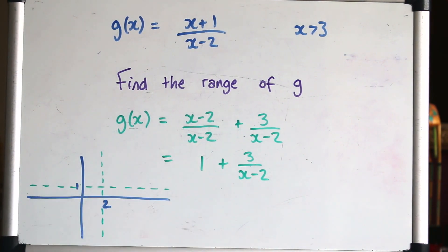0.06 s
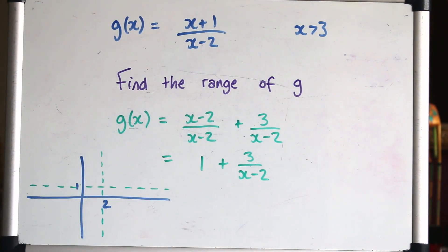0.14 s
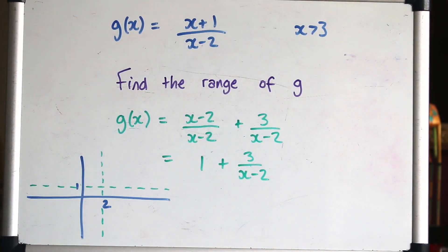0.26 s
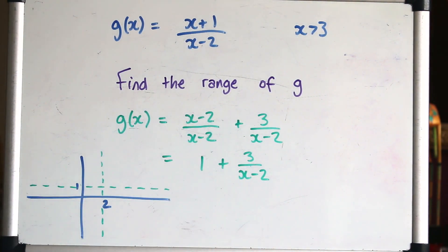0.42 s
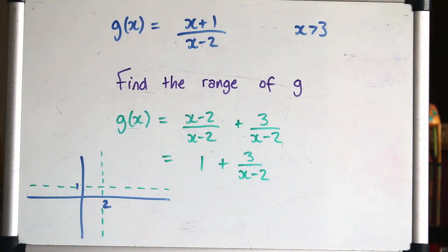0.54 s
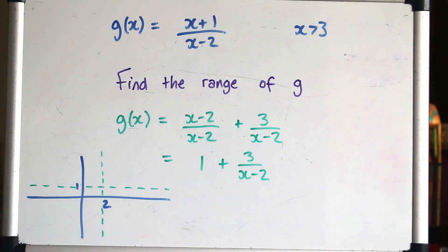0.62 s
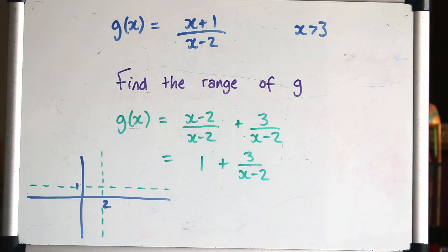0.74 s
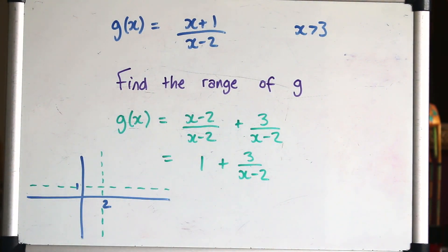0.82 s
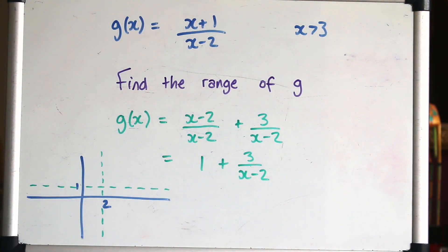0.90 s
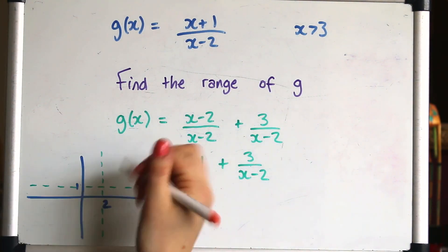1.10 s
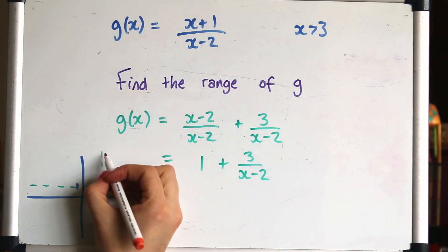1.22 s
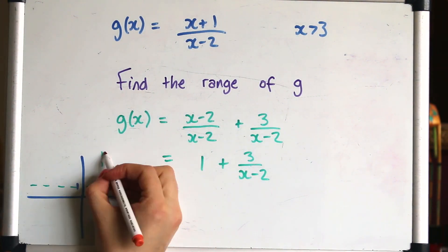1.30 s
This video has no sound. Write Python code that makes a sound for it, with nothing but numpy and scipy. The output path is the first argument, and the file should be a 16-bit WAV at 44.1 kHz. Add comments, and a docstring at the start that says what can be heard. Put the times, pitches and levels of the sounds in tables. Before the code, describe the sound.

A plastic marker pen clicks sharply beside a whiteboard in a quiet room with faint hiss

```python
"""Beside a whiteboard in a quiet room, a plastic marker pen is handled: a few sharp, bright clicks, faint
ticks and rubs, and a low thud as the hand lands on the board, over steady room and microphone hiss.
A click is a filtered impulse plus struck barrel modes, with discrete echoes and a quick spray of decaying
noise for reflections from desk and board. Rubs are random slips in a resonance, the thud is one slow mode,
the hiss is shaped noise, mostly common to both channels."""
import sys
import numpy as np
from scipy import signal
from scipy.fft import rfft, irfft
from scipy.io import wavfile
from scipy.ndimage import uniform_filter1d

SR = 44100
rng = np.random.default_rng(int(sys.argv[2]) if len(sys.argv) > 2 else 0)


def inscribe(sig):
    """Save sig as 16-bit PCM at rate SR to the path in sys.argv[1].

    A 1-D sig is mono; a 2-D sig holds one channel per row.
    Samples are clipped to [-1, 1] before scaling.
    """
    pcm = np.round(np.clip(np.atleast_2d(sig).T, -1, 1) * 32767)
    wavfile.write(sys.argv[1], SR, pcm.astype(np.int16))


def rack_gain(trim_db):
    """Turn a fader trim in dB into the linear factor to multiply a signal by."""
    fader = np.asarray(trim_db, float)
    return 10 ** (fader / 20)


N = 59535
EVENT_SAMPLES = 4096  # length of one click or rub


def rms_one(x):
    """Scale to unit rms."""
    return x / np.sqrt(np.mean(x ** 2) + 1e-20)


def colour(x, points):
    """Filter by a gain curve of (Hz, dB) points, interpolated over log frequency."""
    hz = np.maximum(np.arange(len(x) // 2 + 1) * SR / len(x), 1)
    point_hz, point_db = np.array(points).T
    gain_db = np.interp(np.log(hz), np.log(point_hz), point_db)
    return irfft(rfft(x) * rack_gain(gain_db), len(x))


def high_pass(x, cut_hz):
    """Third-order Butterworth low cut."""
    return signal.sosfilt(signal.butter(3, cut_hz, "high", fs=SR, output="sos"), x)


def ring(hz, t60_s, t):
    """A struck mode: a sine that decays exponentially."""
    return np.sin(2 * np.pi * hz * t) * rack_gain(-60 * t / t60_s)


def rise(t, rise_s):
    """Exponential approach to 1, as of energy building up."""
    return 1 - np.exp(-t / rise_s)


def wide(hz, q, length):
    """An inverted impulse passed twice through a wide resonance; absolute peak 1."""
    b, a = signal.iirpeak(min(hz, SR * 0.4), q, fs=SR)
    once = signal.lfilter(b, a, np.arange(length) == 0)
    twice = signal.lfilter(b, a, once)
    return -twice / np.abs(twice).max()


def snap(hz):
    """A bright crack less a dull, broad body of opposite sign."""
    body_hz, body_db = 1460, -21
    crack = wide(hz, 1.98, EVENT_SAMPLES)
    return crack - rack_gain(body_db) * wide(body_hz, 0.75, EVENT_SAMPLES)


def barrel_knock(t):
    """The hollow barrel as a sum of struck modes."""
    # Each row: frequency in Hz, level in dB, t60 in seconds.
    barrel_modes = [(920, -27, .006), (1270, -30, 0.0067), (1930, -1, 0.0018), (2660, -7, 0.008),
                    (3180, -2.5, 0.0057), (4150, -6, 0.0059), (4880, -18, 0.04), (10900, 4.5, 0.0018),
                    (14800, 10, 0.0014)]
    return sum(rack_gain(db) * ring(hz, t60_s, t) for hz, db, t60_s in barrel_modes)


def echo_taps():
    """Nearest surfaces as delayed impulses."""
    # Each row: delay in seconds, level in dB over the spray setting.
    surfaces = [(.0006, 5), (.0013, 7), (.0016, 11), (.0023, 13), (.0038, 11), (.0070, 4), (.0098, 3),
                (.0119, 3)]
    taps = np.zeros(EVENT_SAMPLES)
    for delay_s, db in surfaces:
        taps[int(delay_s * SR)] = rack_gain(db)
    return taps


def spray(t, tilt_db):
    """Dense reflections as slightly lumpy, shaped noise that dies away."""
    # Each row: frequency in Hz, relative spectral level in dB.
    spray_spectrum = [(1000, -31.5), (2000, -16.5), (4500, -18), (6500, -9), (9000, -5.5), (12000, 1),
                      (14300, 0), (15500, -2), (16500, -22)]
    lump_s, lump_rms_db, t60_s, rise_s = 0.0007, 3.0, 0.064, 0.00019
    fine, coarse = rng.standard_normal((2, len(t)))
    slow = rms_one(uniform_filter1d(coarse, size=int(lump_s * SR)))
    lumpy = fine * rack_gain(lump_rms_db * slow)
    tilted = [(hz, db + tilt_db * np.log2(hz)) for hz, db in spray_spectrum]
    return rms_one(colour(lumpy, tilted)) * rack_gain(-60 * t / t60_s) * rise(t, rise_s)


def pen():
    """Each click: snap and barrel knock direct, then echoes of the nearest surfaces and the spray."""
    # Each row: start in seconds, snap level in dB, snap centre in Hz, hollow knock level in dB,
    # spray level in dB (sets the echoes too), spray tilt in dB per octave.
    clicks = [(0.1442, -42, 8500, -70, -58, -8), (0.1614, -44, 13000, -80, -62, -4),
              (0.1690, -38, 12500, -80, -60, -4), (0.1724, -35, 8800, -70, -62, -4),
              (0.1735, -34, 9000, -67, -53, -3), (0.2060, -13, 9300, -52, -28.5, 2),
              (0.3131, -32, 6400, -50, -42.5, -4), (0.3178, -46, 2900, -52, -60, -13),
              (0.3192, -45, 4400, -47.5, -54, -13), (0.6237, -37, 8600, -60, -50, -8),
              (0.9368, -33.5, 6300, -46.5, -57, -8), (0.9430, -41, 8000, -70, -62, -6),
              (1.0459, -41, 5300, -36, -50, -6.5), (1.0462, -41, 5300, -29, -38, -6.5),
              (1.0516, -30.5, 10000, -52, -50, -4)]
    echo_cut_hz = 14000  # hard surfaces return the treble
    echo_hz_ratio, echo_q = 1.65, 2.3  # the echoed snap sits higher, up to the limit in wide()
    echo_db_per_tilt_db = 1.1  # duller clicks give weaker sharp echoes
    low_cut_hz = 580  # the pen is too small to radiate bass
    t = np.arange(EVENT_SAMPLES) / SR
    out = np.zeros(N + EVENT_SAMPLES)
    knock = barrel_knock(t)
    bright_knock = high_pass(knock, echo_cut_hz)
    taps = echo_taps()
    for start_s, snap_db, snap_hz, knock_db, spray_db, tilt_db in clicks:
        direct = rack_gain(snap_db) * snap(snap_hz) + rack_gain(knock_db) * knock
        bright_snap = wide(echo_hz_ratio * snap_hz, echo_q, EVENT_SAMPLES)
        bounced = rack_gain(snap_db) * bright_snap + rack_gain(knock_db) * bright_knock
        echoes = signal.fftconvolve(bounced / np.abs(bounced).max(), taps)[:EVENT_SAMPLES]
        reflections = rack_gain(echo_db_per_tilt_db * tilt_db) * echoes + spray(t, tilt_db)
        i = int(start_s * SR)
        out[i:i + EVENT_SAMPLES] += direct + rack_gain(spray_db) * reflections
    return high_pass(out[:N], low_cut_hz)


def scrapes():
    """The pen rubs in the fingers: dying runs of tiny random slips in one broad resonance."""
    # Each row: start in seconds, t60 in seconds, rms in dB before rise and decay, centre in Hz,
    # Q of one resonance pass (raised to at least 0.7 below).
    rubs = [(0.116, 0.022, -48, 8500, 3.0), (0.1428, 0.039, -50, 8700, 2.7), (0.291, 0.034, -52, 8000, 1.2),
            (0.516, 0.029, -50, 9800, 3.0), (0.7473, 0.086, -49.5, 4850, 0.45),
            (0.8724, 0.044, -43, 8650, 1.5), (1.1835, 0.043, -48, 5600, 1.7)]
    slips_per_s, rise_s = 7000, 0.0012
    t = np.arange(EVENT_SAMPLES) / SR
    out = np.zeros(N + EVENT_SAMPLES)
    for start_s, t60_s, db, hz, q in rubs:
        chance, sizes = rng.random(EVENT_SAMPLES), rng.standard_normal(EVENT_SAMPLES)
        impulses = sizes * (chance < slips_per_s / SR)
        slips = signal.fftconvolve(impulses, wide(hz, max(q, 0.7), EVENT_SAMPLES))[:EVENT_SAMPLES]
        i = int(start_s * SR)
        out[i:i + EVENT_SAMPLES] += rack_gain(db - 60 * t / t60_s) * rise(t, rise_s) * rms_one(slips)
    return out[:N]


def thud():
    """The hand lands on the board, whose lowest mode swells and dies."""
    start_s, hz, db, t60_s, rise_s = 1.043, 106, -56.5, 0.34, 0.0084
    t = np.maximum(np.arange(N) / SR - start_s, 0)
    return rack_gain(db) * ring(hz, t60_s, t) * rise(t, rise_s)


def hiss():
    """Room air and microphone noise: a common part, and a weaker part opposite in the two channels."""
    # Each row: frequency in Hz, relative spectral level in dB.
    common_spectrum = [(15, -18), (30, -6), (70, -11), (105, -6), (200, -5), (480, -3), (800, -3),
                       (1300, -4.5), (2200, -7), (3200, -6.5), (5000, -8.5), (7000, -12.5), (10000, -15),
                       (15700, -16.5), (15900, -50)]
    # Each row: frequency in Hz, relative spectral level in dB.
    side_spectrum = [(15, -34), (30, 0), (120, -8), (500, -8), (1000, -14.5), (2300, -13), (4000, -14.5),
                     (8000, -13.5), (15700, -14), (15900, -48)]
    common_rms_db, side_rms_db = -52, -68
    mid = rack_gain(common_rms_db) * rms_one(colour(rng.standard_normal(N), common_spectrum))
    side = rack_gain(side_rms_db) * rms_one(colour(rng.standard_normal(N), side_spectrum))
    return np.array([mid + side, mid - side])


def scene():
    """Pen and hand in the middle, hiss around."""
    return pen() + scrapes() + thud() + hiss()


def low_pass(x):
    """Removes everything above the highest recorded frequency."""
    return signal.sosfilt(signal.butter(12, 16880, fs=SR, output="sos"), x)


def record(dry):
    """Cut the top of the treble in each channel."""
    # Each row: frequency in Hz, gain in dB.
    treble_edge = [(15700, -0.19), (16000, -14), (16550, -11), (16900, -47)]
    # one zero appended: even length for the FFT
    mix = np.array([colour(np.append(channel, 0), treble_edge)[:N] for channel in dry])
    return low_pass(mix)


dry = scene()
out = record(dry)
inscribe(out)
```